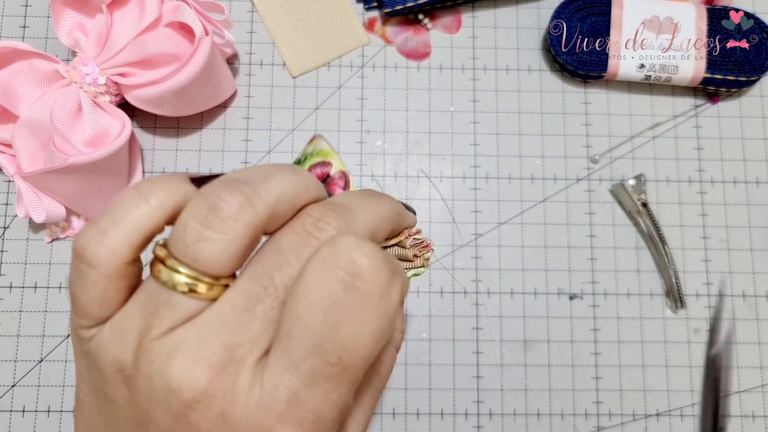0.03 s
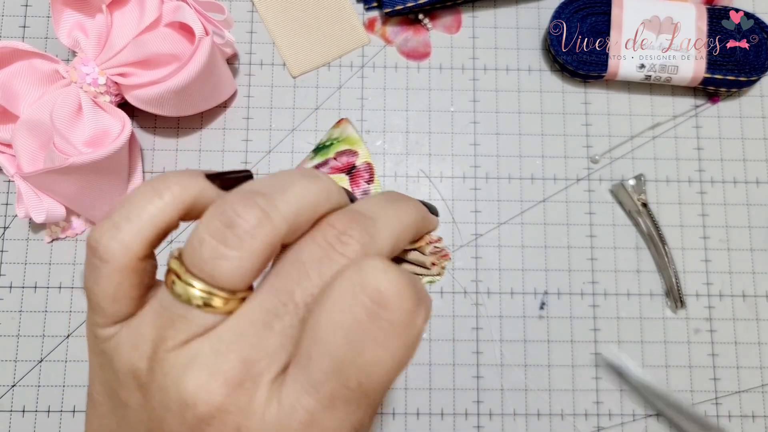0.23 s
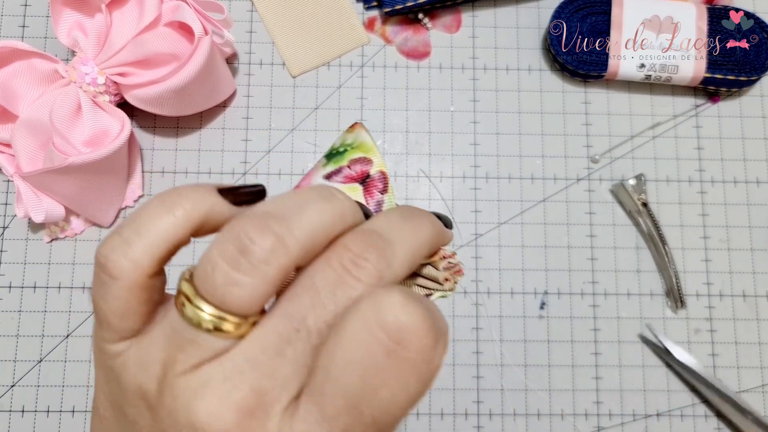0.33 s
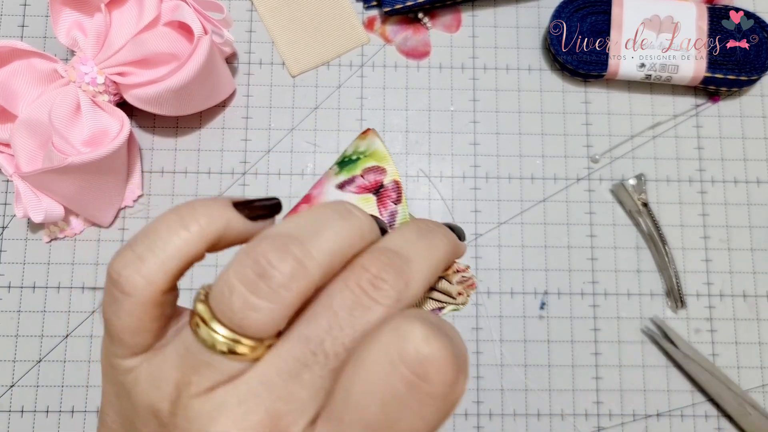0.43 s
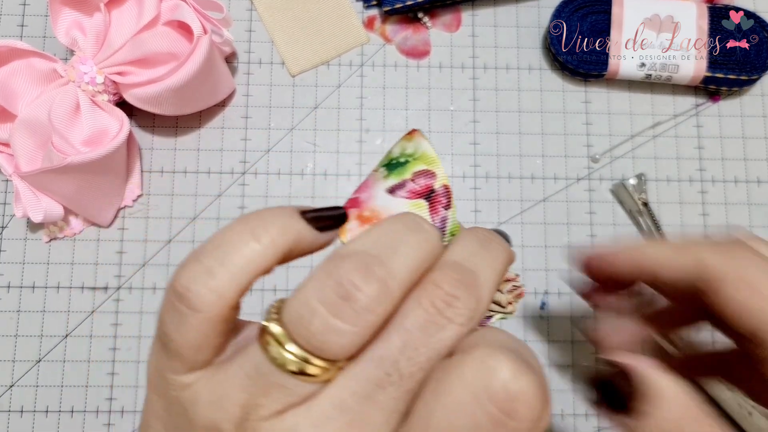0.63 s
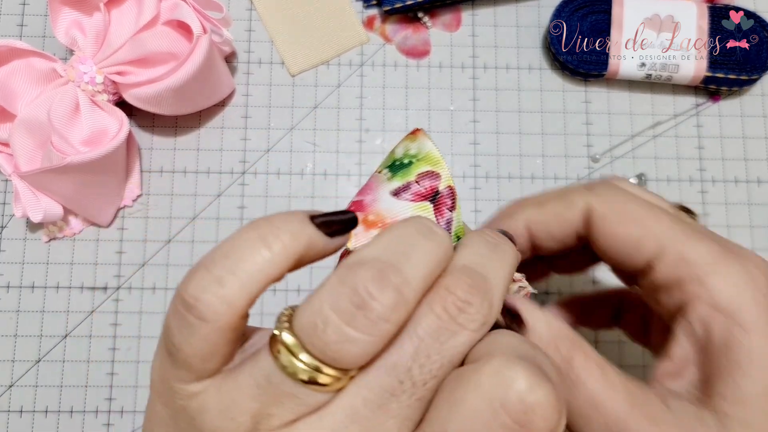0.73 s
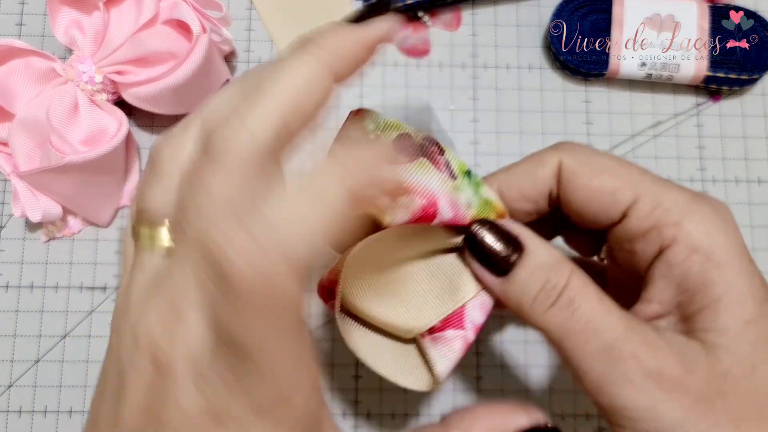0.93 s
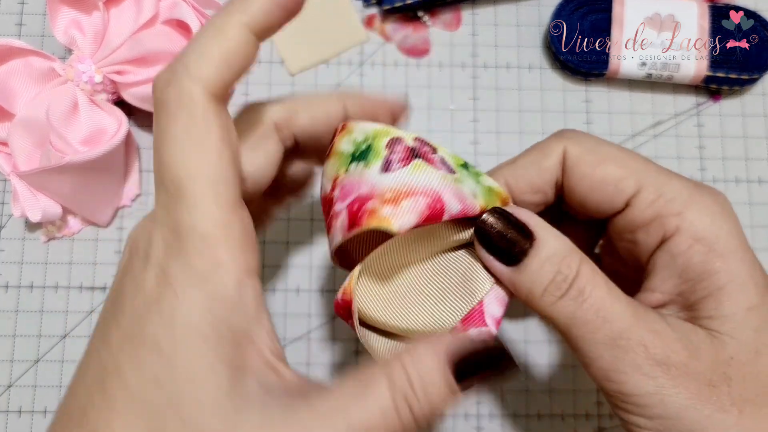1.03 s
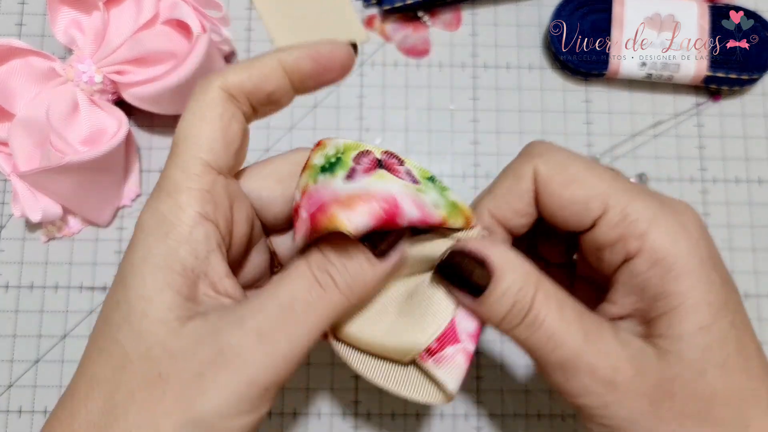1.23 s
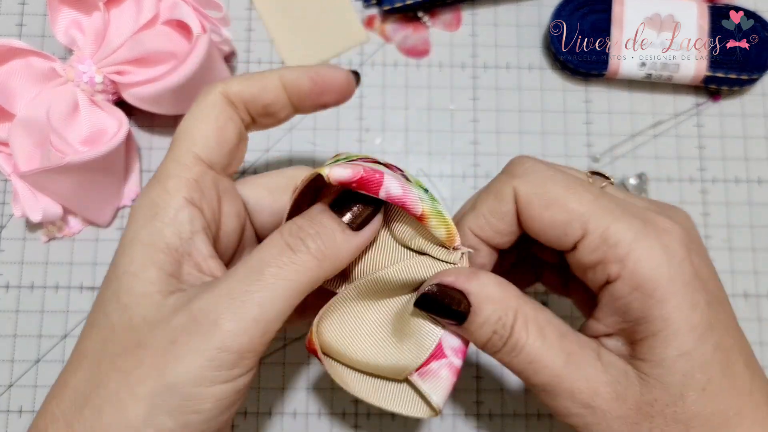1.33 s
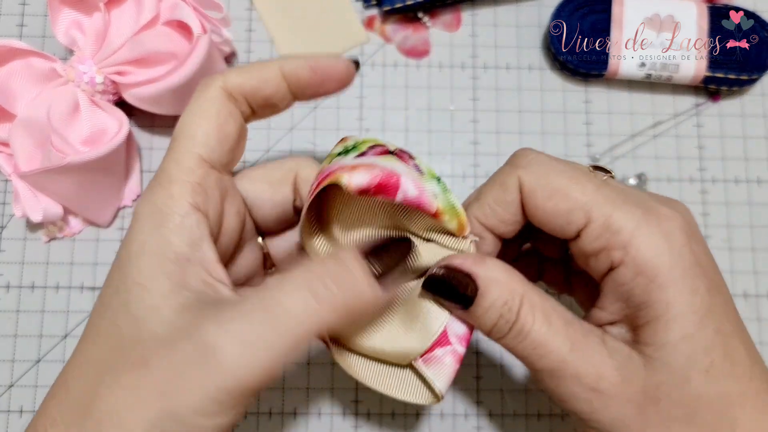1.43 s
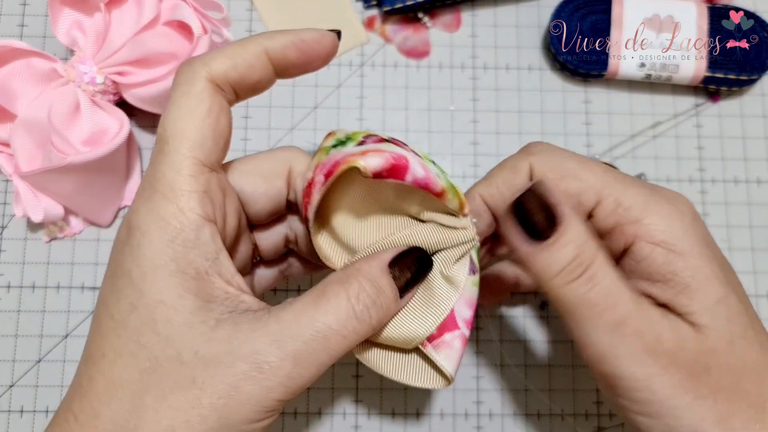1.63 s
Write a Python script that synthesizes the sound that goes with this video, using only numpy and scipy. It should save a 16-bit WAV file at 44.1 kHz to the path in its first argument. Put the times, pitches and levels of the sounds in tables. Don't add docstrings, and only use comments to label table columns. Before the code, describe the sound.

Close up and slightly to the right, metal scissors land on a table mat with a light tap, short slide, sharp clack and dull thud, then quiet nail ticks and ribbon rustle over low room hum.

```python
import sys
import numpy as np
from scipy import signal
from scipy.io import wavfile

SR = 44100
rng = np.random.default_rng(int(sys.argv[2]) if len(sys.argv) > 2 else 0)


def wav_out(sig):
    wavfile.write(sys.argv[1], SR, np.round(np.clip(np.atleast_2d(sig).T, -1, 1) * 32767).astype(np.int16))


def natural_amplitude(level_db):
    exponent = np.asarray(level_db, float) / 20
    return 10 ** exponent


N = 74970


def in_time(rows):
    s, *columns = np.transpose(rows)
    return [np.interp(np.arange(N) / SR, s, column) for column in columns]


def at_hz(points, hz):
    table_hz, values = np.transpose(points)
    return np.interp(np.log(hz), np.log(table_hz), values)


def rms_one(x):
    return x / np.sqrt(np.mean(x ** 2) + 1e-20)


def filtered(x, hz, kind="low"):
    return signal.sosfilt(signal.butter(2, hz, kind, fs=SR, output="sos"), x)


def ring(clicks, hz, t60):
    radius, turn = natural_amplitude(-60 / (t60 * SR)), 2 * np.pi * hz / SR
    return signal.lfilter([0, np.sin(turn)], [1, -2 * radius * np.cos(turn), radius ** 2], clicks + 1e-18)


def soft_ring(s, db, hz, cycles):
    first = (s * SR).astype(int)[:, None]
    t = np.arange(400) / SR - (s * SR % 1)[:, None] / SR
    hz = hz[:, None]
    swell = np.maximum(t, 0) * hz / cycles
    bursts = -natural_amplitude(db)[:, None] * swell * np.exp(1 - swell) * np.sin(2 * np.pi * hz * t)
    out = np.zeros(N)
    np.add.at(out, first + np.arange(400), bursts)
    return out


def clicks_at(s, heights):
    at, out = np.asarray(s) * SR, np.zeros(N + 1)
    np.add.at(out, at.astype(int), heights * (1 - at % 1))
    np.add.at(out, at.astype(int) + 1, heights * (at % 1))
    return out[:N]


def grains(per_s, spread_db):
    sizes = natural_amplitude(spread_db * np.minimum(rng.exponential(1, N), 5)) * rng.choice([-1, 1], N)
    return sizes * (rng.random(N) < per_s / SR)


def bands(white):
    edges = 22 * 2 ** np.arange(0, 9.6, .5)
    for k, (low, high) in enumerate(zip(edges, edges[1:])):
        yield np.sqrt(low * high), filtered(white[k % 2], [low, high], "band")


def from_right(x, left_db):
    lag_s = .00025
    late = np.interp(np.arange(N) - lag_s * SR, np.arange(N), x)
    return np.array([natural_amplitude(left_db) * late, x])


def hush():
    # frequency in Hz, level in dB per Hz.
    body = [(25, -25.5), (45, -7), (100, -18), (160, -13.5), (350, -21), (760, -24.5), (980, -32),
            (1700, -37)]
    hiss = [(2400, -44), (4000, -49.5), (5500, -63.5), (9000, -62), (16000, -63)]
    # frequency in Hz, left-right likeness from -1 to 1.
    likeness = [(60, 0.51), (150, .97), (400, .7), (950, 0.069), (3770, 0.36), (15000, -.1)]
    # time in seconds, level change in dB.
    stir = [(0, -1.8), (.5, 3.5), (.65, 2.5), (.8, 2.5), (.92, -1.5), (1.3, 1.9), (1.7, 0.3)]
    out = 0
    for hz, (mid, side) in bands(rng.standard_normal((2, 2, N))):
        alike = np.clip(at_hz(likeness, hz), -1, 1)
        stereo = np.sqrt(1 + alike) * mid + np.sqrt(1 - alike) * side * [[1], [-1]]
        out = out + natural_amplitude(at_hz([*body, *hiss], hz)) * stereo
    level_db = -60.5
    return natural_amplitude(level_db + in_time(stir)[0]) * rms_one(out)


def motors():
    # frequency in Hz, rms level in dB, starting phase in turns.
    hums = [
        (57.6, -63.5, -.011),
        (61.8, -58.2, -.283),
    ]
    wobble_db = 1.2
    t = np.arange(N) / SR
    out = np.zeros(N)
    for hz, db, turns in hums:
        wobble = np.interp(t, np.linspace(0, N / SR, 14), rng.standard_normal(14))
        out += np.sqrt(2) * natural_amplitude(db + wobble_db * wobble) * np.sin(2 * np.pi * (hz * t + turns))
    return out


def room(x):
    # frequency in Hz, decay time t60 in seconds.
    decay = [(100, .4), (500, 0.69), (2000, 0.34), (5000, 0.27), (12000, 0.26)]
    # frequency in Hz, echo level in dB.
    colour = [(100, -2.5), (700, 4.2), (950, -3), (1500, 6), (2600, 4.5), (4500, -4), (8000, 5),
              (13000, 0.04)]
    level_db, start_s = -5.5, 0.0018
    t = np.arange(SR // 2) / SR
    tail = 0
    for hz, band in bands(rng.standard_normal((2, 2, len(t)))):
        tail = tail + natural_amplitude(at_hz(colour, hz) - 60 * t / at_hz(decay, hz)) * band
    tail = tail * np.clip(t / start_s - 1, 0, 1)
    tail = tail / np.sqrt(np.sum(tail ** 2) / 2)
    return natural_amplitude(level_db) * signal.fftconvolve(x[None], tail, axes=1)[:, :N]


def table():
    # time in seconds, push level in dB.
    thuds = [(.196, -43), (.238, -45), (0.296, -47.5), (0.336, -56.5), (0.369, -39), (.385, -36.5),
             (.399, -37), (.449, -46.5)]
    # frequency in Hz, level in dB, t60 in seconds.
    modes = [(76.5, -8.5, 0.22), (147, -7.5, 0.22), (212.5, -1.15, .1), (240.4, -10, 0.22),
             (300, -4.5, .06), (451, -8.5, 0.094), (541.4, -9.5, .11), (666, -13, 0.033)]
    s, db = np.transpose(thuds)
    push = filtered(clicks_at(s, natural_amplitude(db)), 700)
    return sum(natural_amplitude(mode_db) * ring(push, hz, t60) for hz, mode_db, t60 in modes)


def ribbon():
    # time in seconds, rustle level in dB.
    rustle = [(0, -93), (.78, -94.5), (.845, -73), (.88, -95), (1.09, -104), (1.115, -85), (1.15, -78.5),
              (1.22, -62), (1.29, -69.5), (1.33, -75), (1.40, -79), (1.45, -91), (1.495, -65.5),
              (1.54, -90.5), (1.62, -102), (1.65, -84), (1.68, -92.5), (1.7, -78)]
    # frequency in Hz, level in dB per Hz.
    colour = [(710, -26), (1200, 1.5), (1680, -1), (2020, -6.5), (2860, 2), (6370, -7.5), (7570, -2),
              (16000, -25)]
    # time in seconds, pitch in Hz, level in dB.
    folds = [(1.30, 2150, -110), (1.33, 2080, -73.5), (1.37, 2000, -73), (1.4, 1945, -71),
             (1.45, 1654, -67), (1.51, 1792, -72.5), (1.55, 1700, -110)]
    # time in seconds, peak level in dB, frequency in Hz, length in cycles.
    nails = [(.848, -57.5, 8510, 3.2), (1.015, -50.5, 11570, 5.1), (1.113, -55.5, 3000, 3.2),
             (1.114, -47.5, 910, 1.7), (1.177, -48, 1517, 0.92), (1.189, -44.5, 910, 4.4),
             (1.189, -41, 1444, 1.7), (1.189, -54.5, 5600, 15), (1.189, -51.5, 3000, 3.0),
             (1.113, -50.5, 5480, 1.1), (1.114, -55, 12040, 1.8)]

    grit = np.array([[grains(per_s=3900, spread_db=3) for _ in range(2)] for _ in range(2)])
    cloth = rms_one(sum(natural_amplitude(at_hz(colour, hz)) * band for hz, band in bands(grit) if hz > 1000))

    hz, hollow_db = in_time(folds)
    slow = filtered(rng.standard_normal((2, 2, N)), 110)
    turn = 2 * np.pi * np.cumsum(hz) / SR
    tone = slow[0] * np.cos(turn) + slow[1] * np.sin(turn)
    overtone_on = np.arange(N) < 1.39 * SR
    overtone = natural_amplitude(-13) * overtone_on * slow[0, ::-1] * np.cos(2.42 * turn)
    hollow = natural_amplitude(hollow_db) * rms_one(tone + overtone)

    ticks = sum(ring(clicks_at([s], -natural_amplitude(db)), f, 3.45 * cycles / f) for s, db, f, cycles in nails)
    return natural_amplitude(in_time(rustle)[0]) * cloth + hollow, ticks


def scissors():
    # time in seconds, peak in dB, crack pitch in Hz, handle knock in dB, blade ping in dB.
    contacts = [
        (0.1985, -30, 5740, -4, -7),
        (.2368, -42, 4000, 1.0, -4.5),
        (0.2638, -47.5, 3870, -8, -11),
        (.2885, -49, 3860, -9.5, -9.5),
        (0.3377, -29, 4243, -6.5, -7),
        (.3699, -28, 3880, -4, -14.5),
        (0.3737, -34.5, 3000, -6.5, -7.5),
        (0.3846, -8.5, 3380, -17, -7),
        (.3965, -33.5, 2452, -6.5, -8),
        (0.4504, -25, 3390, -9.5, -11),
    ]
    # frequency in Hz, level in dB, t60 in seconds.
    handles = [(637, -8, 0.02), (1311, -0.5, 0.017), (1700, -0.5, .010), (2150, -0.5, .009),
               (2656, -0.36, 0.0065), (4170, -2, .006), (5620, -1, .007)]
    # frequency in Hz, level in dB, t60 in seconds.
    blades = [(7500, -15, .005), (8800, -14, .004), (10700, -2, .004), (11900, -1, .0035),
              (14300, -10, .003)]
    # time in seconds, level in dB.
    sliding = [(.2, -97), (.24, -64.5), (.265, -64.5), (.29, -57.5), (.325, -71), (.345, -60.5), (.37, -91)]
    blade_delay_s, spread_db = .0003, 2.5
    grit_db, grit_s = -12.5, 0.0021

    s, db, crack_hz, knock_db, ping_db = np.transpose(contacts)
    luck = rng.standard_normal((len(s), 12))
    slide = natural_amplitude(in_time(sliding)[0])
    grit = slide * rms_one(grains(per_s=2000, spread_db=4.0))

    def strike(modes, at_s, strength_db, first):
        out = np.zeros(N)
        for k, (hz, mode_db, t60) in enumerate(modes):
            hits = clicks_at(at_s, natural_amplitude(strength_db + mode_db + spread_db * luck[:, first + k]))
            out += (-1) ** k * ring(hits + 0.18 * natural_amplitude(mode_db) * grit, hz, t60)
        return out

    crack = filtered(soft_ring(s, db, crack_hz, cycles=.44), 1300, "high")
    hits = clicks_at(s + blade_delay_s, natural_amplitude(db + grit_db))
    dying = signal.lfilter([1], [1, -np.exp(-1 / (grit_s * SR))], hits)
    rattle = filtered((dying + slide) * rng.standard_normal(N), [1300, 9000], "band")
    knock = filtered(strike(handles, s, db + knock_db, first=0), 350, "high")
    ping = filtered(strike(blades, s + blade_delay_s, db + ping_db, first=7), 6000, "high")
    hiss = natural_amplitude(-5.5) * slide * signal.lfilter([1, -.1], [1], rng.standard_normal((2, N)))
    return from_right(crack + rattle + knock, left_db=-3.5) + from_right(ping, left_db=-13.5) + hiss


def scene():
    steel, thud, (cloth, ticks) = scissors(), table(), ribbon()
    echo = room(steel[0] + 0.5 * ticks + 0.39 * thud)
    return hush() + motors() + echo + thud + cloth + ticks + steel


def top_cut(x):
    return signal.sosfilt(signal.butter(12, 16460, fs=SR, output="sos"), x)


def record(dry):
    mix = filtered(dry, 38.4, "high")
    mix = signal.sosfilt(signal.cheby2(10, 50, 16600, fs=SR, output="sos"), mix)
    return top_cut(mix)


dry = scene()
out = record(dry)
wav_out(out)
```